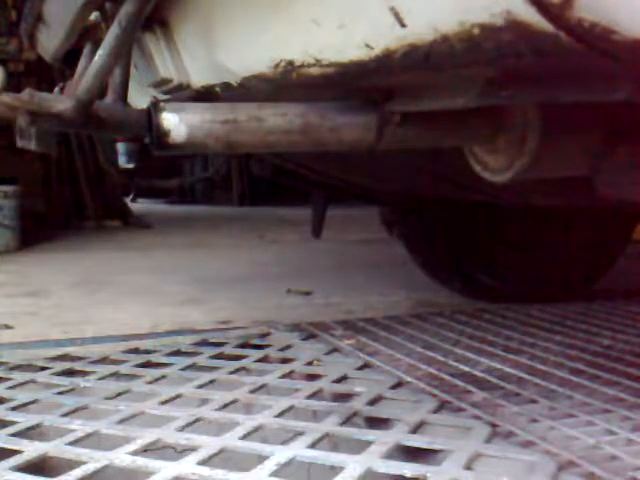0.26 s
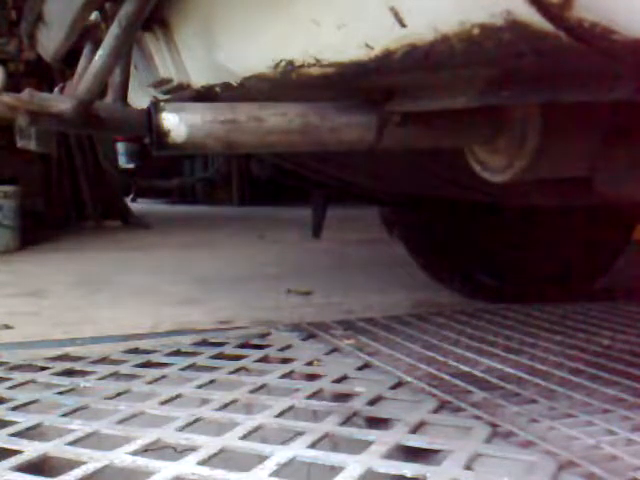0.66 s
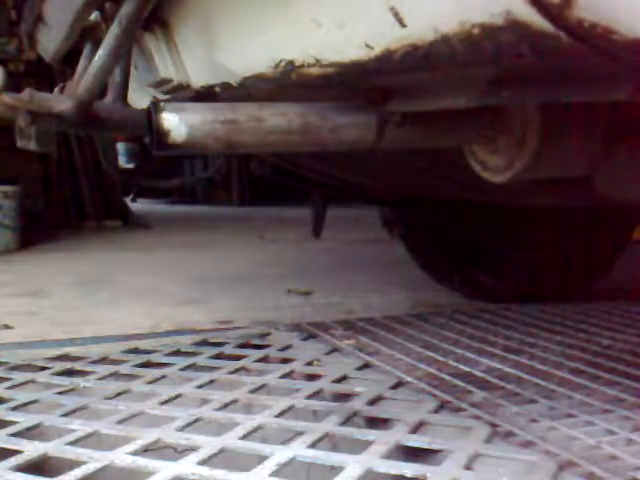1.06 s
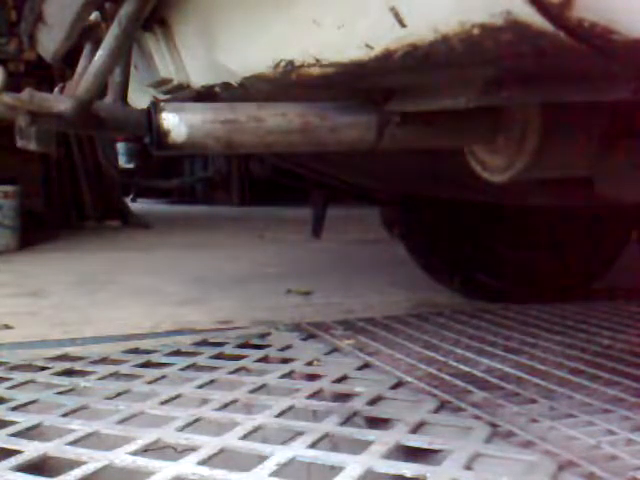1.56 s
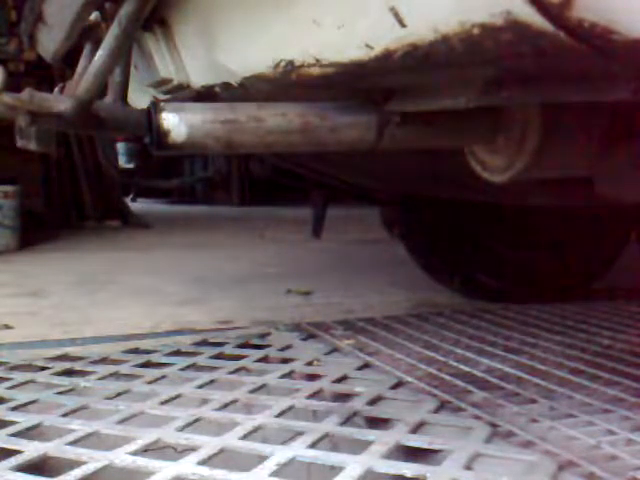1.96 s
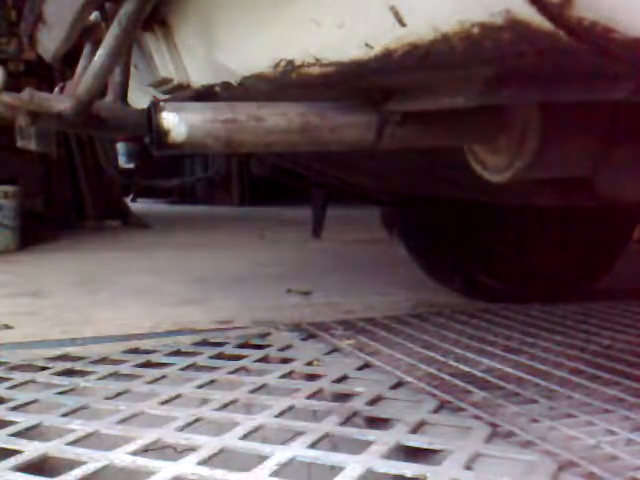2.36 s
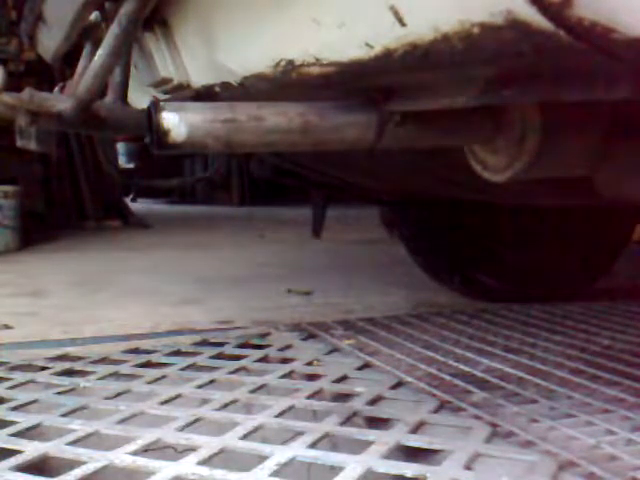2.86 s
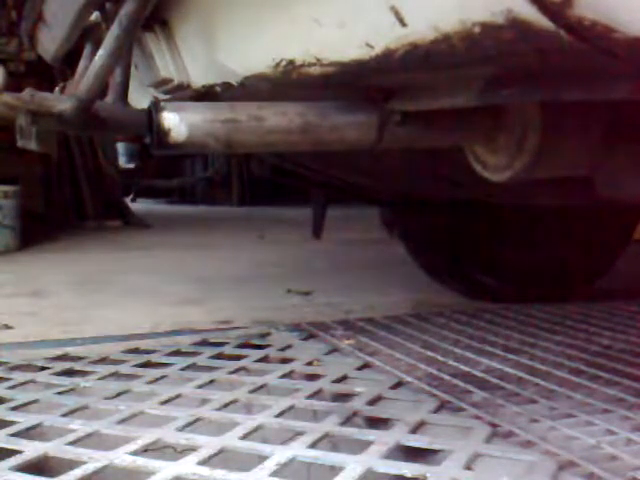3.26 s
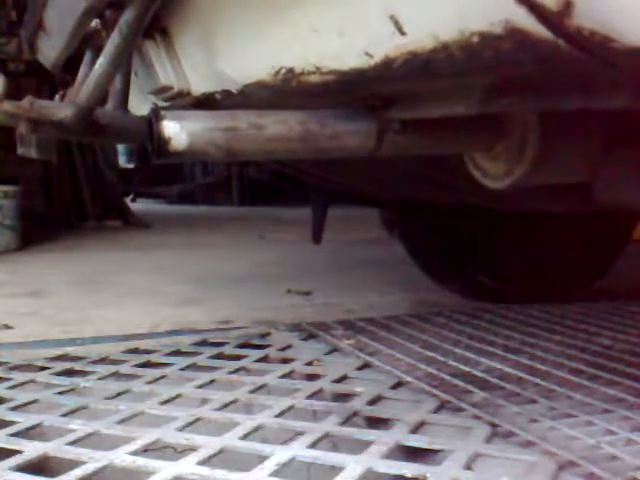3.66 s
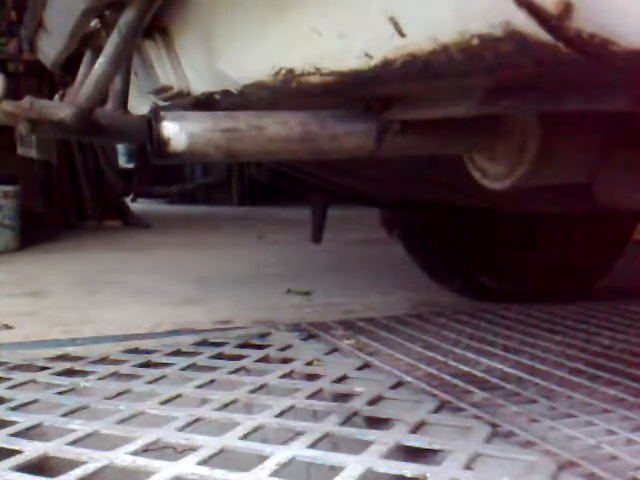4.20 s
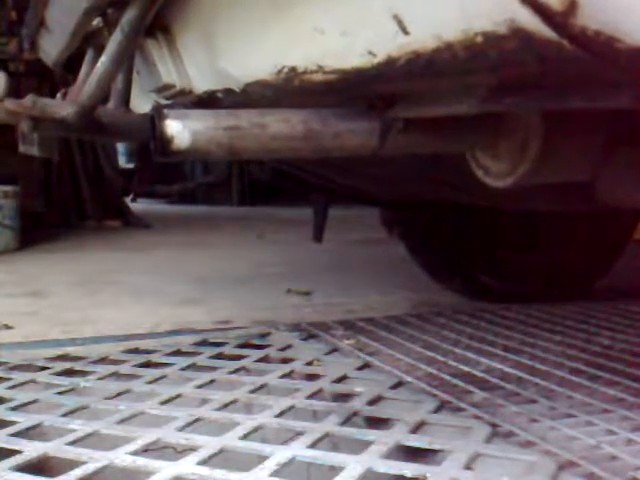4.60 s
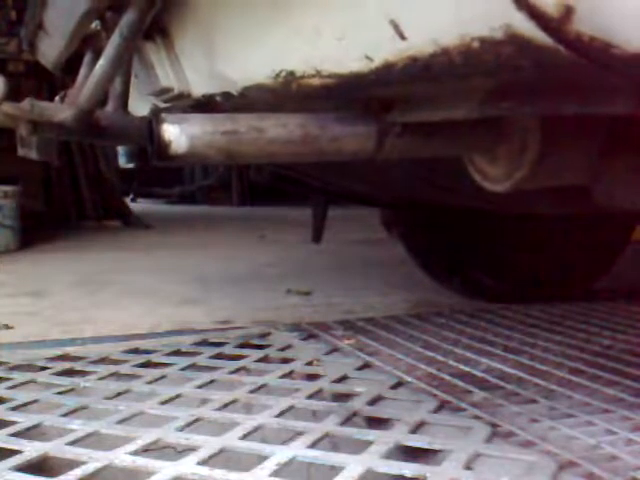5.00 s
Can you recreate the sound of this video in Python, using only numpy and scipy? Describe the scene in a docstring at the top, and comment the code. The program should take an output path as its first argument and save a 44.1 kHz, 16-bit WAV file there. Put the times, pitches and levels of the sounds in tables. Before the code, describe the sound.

Shoes scuff on concrete beside a car, a handle clacks, a dry hinge squeaks, and the door slams with a deep boom.

```python
"""Beside a car in a workshop, shoes scuff over concrete, dull knocks fall among them and a door handle clacks.
The door swings on a dry hinge, is pulled shut with a slam, and steel parts rub once more. Impacts and friction
are shaped noise, resonances and damped or wavering sines; hard walls answer each with decaying noise. A low
rumble, stirred up by the slam, and hiss lie under it all; the recorder turns its gain down after loud sounds."""
import sys
import numpy as np
from scipy import signal
from scipy.fft import rfft, irfft, next_fast_len
from scipy.io import wavfile
from scipy.ndimage import uniform_filter1d, minimum_filter1d, map_coordinates

SR = 44100
rng = np.random.default_rng(int(sys.argv[2]) if len(sys.argv) > 2 else 0)


def dump(signal):
    """Clip the signal to [-1, 1] and save it as 16-bit WAV at the path in sys.argv[1]."""
    limited = np.clip(np.atleast_2d(signal).T, -1, 1)
    pcm = np.round(limited * 32767).astype(np.int16)
    wavfile.write(sys.argv[1], SR, pcm)


N = 230995  # samples

HANDLE_S, LATCH_S = 1.742, 4.153  # s, onsets of the handle's clack and of the slam

# Three passages of steel rubbing on steel, each a list of breakpoints:
# [t/s, rubbing level/dB, groan level/dB, whistle level/dB]
RUBBING_PASSAGES = [
    [(2.98, -46, -31.5, -62), (3.07, -51, -50.5, -60), (3.16, -44, -37, -57), (3.23, -44.5, -38, -54),
     (3.3, -43.5, -40.5, -34.5), (3.37, -48.5, -53.5, -43.5), (3.47, -57.5, -71, -46),
     (3.53, -53.5, -47.5, -71), (3.78, -73, -53.5, -74)],
    [(3.862, -52.5, -34.5, -59), (3.94, -54, -59, -50), (4.01, -48.5, -60, -51), (4.08, -49, -40, -46),
     (4.15, -41, -50, -53)],
    [(4.815, -56.5, -38, -72.5), (4.89, -48.5, -46, -44.5), (4.95, -50, -40, -62), (5.01, -43, -51, -63),
     (5.07, -48, -55.5, -44), (5.13, -54, -60, -60), (5.24, -65, -57, -70)],
]


def amp(db):
    """Level in dB to amplitude ratio: 20 dB is a factor of ten."""
    return 10 ** (np.asarray(db) / 20)


def unit(x):
    """Normalisation to a root-mean-square value of one."""
    return x / np.sqrt(np.mean(x ** 2) + 1e-20)


def along(points, hz):
    """Interpolates (f/Hz, value) points on a logarithmic frequency axis."""
    f, v = np.transpose(points)
    return np.interp(np.log(hz + 1), np.log(f + 1), v)


def wobble(rate, size):
    """Band-limited random modulation: a smooth curve through rate random knots a second."""
    knots = rng.standard_normal(int(size * rate / SR) + 4)
    return map_coordinates(knots, [np.arange(size) * rate / SR])


def filtered(x, response):
    """Linear filtering: the spectrum of x is multiplied by a response of frequency."""
    m = next_fast_len(len(x) + 8192)
    spectrum = rfft(x, m) * response(np.fft.rfftfreq(m, 1 / SR))
    return irfft(spectrum, m)[:len(x)]


def resonances(modes):
    """Modal superposition: the causal response of (f/Hz, width/Hz, level/dB) modes, alternating in sign."""
    def response(f):
        total = 0
        for k, (centre, width, db) in enumerate(modes):
            mode = 1j * f * width / (centre * centre - f * f + 1j * f * width)
            total = total + (-1) ** k * amp(db) * mode
        return total
    return response


def add(out, s, dry, wet_db):
    """Reverberation: mixes a sound in at s seconds with a diffuse tail that builds up and dies band by band."""
    # Reverberation time of the hard walls: [f/Hz, t60/s]
    wall_t60 = [(80, 0.38), (250, 0.58), (1000, 0.39), (4000, 0.36), (8000, 0.19), (14000, 0.13)]
    hz, t, z = signal.stft(rng.standard_normal(SR), SR, nperseg=256)
    decay = amp(-60 * t / along(wall_t60, hz)[:, None])
    tail = signal.istft(z * decay, SR, nperseg=256)[1]
    tail *= 1 - np.exp(-np.arange(len(tail)) / SR / 0.004)  # 4 ms build-up
    heard = amp(wet_db) * signal.fftconvolve(dry, tail / np.linalg.norm(tail))
    heard[:len(dry)] += dry
    part = out[round(s * SR):]
    part[:len(heard)] += heard[:len(part)]


def burst(spectrum, rise, hold, fall):
    """Impact noise: a coloured spectrum swells for rise s, lasts hold s and falls 60 dB in fall s."""
    t = np.arange(SR // 2) / SR
    noise = unit(filtered(rng.standard_normal(len(t)), lambda hz: amp(along(spectrum, hz))))
    noise = noise * amp(2.8 * wobble(127.7, size=len(t)))  # parts chatter against each other
    swell = np.minimum(t / rise, 1) ** 2
    return noise * swell * amp(-60 * np.maximum(t - rise - hold, 0) / fall)


def door():
    """Impact excitation: handle and latch clack, the door beds into its frame, its skin booms in damped modes."""
    # Spectral density of clacking handle and latch: [f/Hz, relative level/dB per Hz]
    clack_spectrum = [(60, -47.5), (120, -1.5), (250, -11), (800, -2), (2000, -6.5), (4000, -12.5),
                      (6500, -26), (10000, -25.5), (15800, -31.5)]
    # Spectral density of the door striking its frame: [f/Hz, relative level/dB per Hz]
    slam_spectrum = [(15, -46), (30, -9.5), (60, -2), (100, 1), (180, 2), (350, -7.5), (600, -10),
                     (1200, -15.5), (2500, -22.5), (4500, -31), (6800, -36.5), (11000, -34), (15800, -41)]
    # Modes of the door skin: [f/Hz, relative level/dB, t60/s]
    skin_modes = [(57.7, -7.5, .8), (86.7, 1, 0.27), (116, -3.5, 0.36), (184, 5, 0.48), (232, 9, 0.41),
                  (362.7, 8.5, 0.38), (543, -2.5, 0.68), (745, -18, .4), (1080, -8, 0.51)]
    out, t = np.zeros(N), np.arange(SR) / SR
    handle = burst(clack_spectrum, rise=0.013, hold=0.012, fall=0.24)
    add(out, HANDLE_S, amp(-18.5) * handle, wet_db=-7.5)
    latch = burst(clack_spectrum, rise=0.0093, hold=0.0025, fall=0.22)
    add(out, LATCH_S, amp(-14.5) * latch, wet_db=0.0)
    slam = burst(slam_spectrum, rise=0.016, hold=0.039, fall=0.15)
    add(out, LATCH_S + .005, amp(-6.5) * slam, wet_db=0.5)
    boom = sum(amp(db - 60 * t / t60) * np.sin(2 * np.pi * hz * t) for hz, db, t60 in skin_modes)
    add(out, LATCH_S + .011, amp(-20.0) * boom * (1 - np.exp(-t / .015)), wet_db=-22)
    return out


def swing(rows):
    """Piecewise-linear envelopes: start time, seconds since then and the dB columns of one passage."""
    s, *levels_db = np.transpose(rows)
    t = np.arange(s[0], s[-1], 1 / SR)
    return s[0], t - s[0], *[np.interp(t, s, db) for db in levels_db]


def hinge():
    """Friction excitation: uneven rubbing rasps, rings the steel's narrow modes and shakes the door's low ones."""
    # Spectral density of the rasp: [f/Hz, relative level/dB per Hz]
    rasp_spectrum = [(200, -25.5), (400, -12.5), (1000, -6), (2000, -8.5), (3200, -11), (6000, -27),
                     (15800, -49.5)]
    # Ringing modes of the steel: [f/Hz, width/Hz, relative level/dB]
    steel_modes = [(1060, 59, -7), (1605, 40, -5.5), (1720, 39, -1.5), (2437, 130, -2), (2987, 91, -3.5),
                   (3610, 49, -9.5)]
    # Low modes of the door: [f/Hz, width/Hz, relative level/dB]
    groan_modes = [(151, 200, -10.5), (190, 15, 5.5), (262, 16, 3.5), (293.4, 7.9, 3.5), (400, 190, -6.5),
                   (700, 660, -14.5)]
    firm_db = -45  # rubbing level at which the settled ring stands ring_db over the rasp
    ring_db, ring_growth, ring_build_s = -0.5, 1.24, 0.1  # dB, dB of ring per dB of rubbing, s

    def rasp_path(hz):
        return amp(along(rasp_spectrum, hz))

    def modal_path(modes):
        response = resonances(modes)
        return lambda hz: response(hz) / (1 + (hz / 4500) ** 4)  # steep treble loss

    out = np.zeros(N)
    paths = (rasp_path, modal_path(steel_modes), modal_path(groan_modes))
    for rows in RUBBING_PASSAGES:
        s, t, rub_db, groan_db, _ = swing(rows)
        slip = amp(1.5 * wobble(50, size=SR))[:len(t)]
        rasp, ring, groan = [unit(filtered(slip * rng.standard_normal(SR)[:len(t)], path))
                             for path in paths]
        ring_level = amp(firm_db + ring_db + ring_growth * (rub_db - firm_db))
        ring = ring * ring_level * (1 - np.exp(-t / ring_build_s))
        add(out, s, amp(rub_db) * rasp + ring + amp(groan_db) * groan, wet_db=-0.5)
    return out


def whistle():
    """Tonal friction: the hinge pin sings one thin tone, modulated in level and slightly in phase."""
    whistle_hz = 1740
    out = np.zeros(N)
    for rows in RUBBING_PASSAGES:
        s, t, *_, db = swing(rows)
        flutter_db = 3 * wobble(30, size=SR)[:len(t)]
        waver = 1.6 * wobble(22.6, size=SR)[:len(t)]  # rad
        tone = np.sin(2 * np.pi * whistle_hz * t + waver)
        add(out, s, amp(db + flutter_db) * tone, wet_db=-20.5)
    return out


def knocks():
    """Damped oscillation: heels and door stops each give one low decaying push and a short higher tick."""
    # Dull knocks: [t/s, level/dB, f/Hz, cycles until 60 dB down]
    knock_events = [(0.594, -21, 297, 3.5), (.757, -30, 156, 5), (0.79, -36, 160, 4), (2.198, -25, 372, 5),
                    (2.252, -15.5, 250, 4), (2.275, -30, 473, 31), (2.611, -36.5, 540, 20),
                    (2.974, -20.5, 238, 5.5), (3.716, -39, 500, 8.5), (3.8636, -22.5, 300, 4.5),
                    (3.8962, -20, 300, 3.5), (4.12, -27, 890, 19), (4.814, -37.5, 300, 16),
                    (4.912, -36, 570, 8), (4.955, -32, 600, 2)]
    contact_s = .0011  # soft start of the push
    out, t = np.zeros(N), np.arange(SR // 4) / SR
    for s, db, hz, cycles in knock_events:
        push = np.sin(2 * np.pi * hz * t) * amp(-60 * t * hz / cycles)
        push = push * (1 - np.exp(-t / contact_s))
        tick = 0.42 * np.sin(2 * np.pi * 3.04 * hz * t) * amp(-60 * t / 0.0053)
        add(out, s, amp(db) * (push + tick), wet_db=2.5)
    return out


def scuffs():
    """Sliding friction: grit makes grainy noise, thinning slowly below its centre and fast above, plus a hiss."""
    # Dragging soles and cloth: [t/s, level/dB, fade/s, centre f/Hz, hiss level/dB before a cap at -8 dB]
    scuff_events = [(0, -62, 0.032, 2170, -40), (.082, -44.5, 0.046, 730, -29),
                    (.121, -45.5, 0.038, 2520, -27), (.29, -55, 0.096, 453, -37),
                    (0.401, -51.5, 0.081, 2500, -28), (.632, -50.5, 0.045, 2440, -20),
                    (.756, -55.5, 0.056, 490, -45), (1.136, -52.5, 0.031, 860, -43),
                    (1.152, -53.5, 0.18, 2520, -14), (1.235, -54.5, 0.074, 2620, -7),
                    (1.52, -46.5, 0.044, 2540, -30), (1.64, -53.5, 0.019, 3040, -7),
                    (1.982, -48, 0.013, 513, -24), (2.192, -33, 0.033, 1510, -25),
                    (2.235, -31.5, 0.035, 2800, -20.5), (2.4, -62, 0.12, 2010, -35),
                    (2.53, -50, .15, 2500, -16), (2.598, -45, 0.059, 1150, -13.5),
                    (2.679, -52, 0.065, 2400, -36), (2.802, -40.5, 0.13, 1950, -18),
                    (2.859, -42, .11, 2950, -9), (3.501, -48.5, 0.082, 726, -24),
                    (3.712, -54, 0.026, 690, -39), (4.108, -37, 0.058, 820, -47)]
    shortest_rise_s, rise_per_fade = 0.0099, .1  # longer drags also start more slowly
    out, t = np.zeros(N), np.arange(SR // 4) / SR
    for s, db, fade, centre_hz, hiss_db in scuff_events:
        def colour(f):
            body = (f / centre_hz) ** .9 / (1 + (f / centre_hz / 1.25) ** 5)
            hiss = amp(min(hiss_db, -8)) * (f > 300) / (1 + f / 7000)
            return body + hiss

        grains = rng.standard_normal(len(t)) * amp(2 * wobble(200, size=len(t)))
        grit = unit(filtered(grains, colour))
        rise = shortest_rise_s + rise_per_fade * fade
        stroke = np.minimum(t / rise, 1) * np.sqrt(np.clip(1 - (t - rise) / fade, 0, 1))
        add(out, s, amp(db) * grit * stroke, wet_db=-1.5)
    return out


def background():
    """Stationary and modulated noise: steady hiss over a lumpy low rumble, which the slam stirs up for a while."""
    # Spectral density shared by rumble and hiss: [f/Hz, relative level/dB per Hz]
    air_spectrum = [(12, -67), (20, -8.5), (78, -1.5), (167, -11), (208, -17.5), (268, -16), (468, -25),
                    (569, -23), (654, -29), (752, -30.5), (3040, -42), (7840, -44.5), (15800, -46.5)]
    # Rumble level ahead of its random modulation: [t/s, level/dB]
    rumble_levels = [(0, -42.5), (.8, -47.5), (1.7, -45.5), (2.6, -48.5), (3.4, -42), (4.0, -46.5),
                     (5.24, -45.5)]
    shake_db, shake_rise_s, shake_t60_s = -19.5, 0.147, 1.43  # the slam swells the rumble
    s, db = np.transpose(rumble_levels)
    t = np.arange(N) / SR
    since = np.maximum(t - LATCH_S, 0)
    shake = amp(shake_db - 60 * since / shake_t60_s) * np.minimum(since / shake_rise_s, 1) ** 2
    level = amp(np.interp(t, s, db)) + shake
    air = unit(filtered(rng.standard_normal(N), lambda hz: amp(along(air_spectrum, hz))))
    low = filtered(air, lambda hz: 1 / (1 + (hz / 300) ** 4))
    hiss = amp(-44.5) * (air - low)
    return hiss + level * amp(0.77 * wobble(16, size=N)) * unit(low)


def scene():
    """Linear superposition of all sources, as one channel."""
    return (door() + hinge() + whistle() + knocks() + scuffs() + background())[None]


def record(dry):
    """Dynamic compression: gain control with a hold and a slow return, then soft clipping and a band limit."""
    top_hz = 15790
    x, t = dry[0], np.arange(N) / SR
    level_db = 10 * np.log10(np.abs(uniform_filter1d(x ** 2, size=1024)) + 1e-12)
    need_db = np.minimum(0, 0.5 * (-10.5 - level_db))  # halves the excess over -10.5 dB
    hold = int(.5 * SR)
    held_db = minimum_filter1d(need_db, size=hold, origin=(hold - 1) // 2)
    # The gain returns at most 20 dB a second
    gain_db = np.minimum(0, np.minimum.accumulate(held_db - 20 * t) + 20 * t)
    x = x * amp(uniform_filter1d(gain_db, size=3001, origin=1500, mode="nearest"))
    x = x / (1 + np.abs(x / .98) ** 6) ** (1 / 6)  # soft clipping
    return filtered(x, lambda hz: hz < top_hz)[None]


dry = scene()
out = record(dry)
dump(out)
```